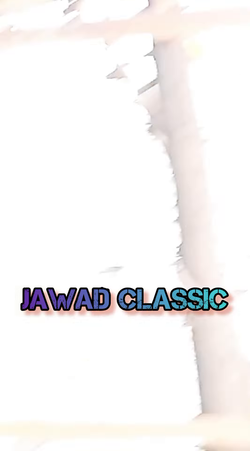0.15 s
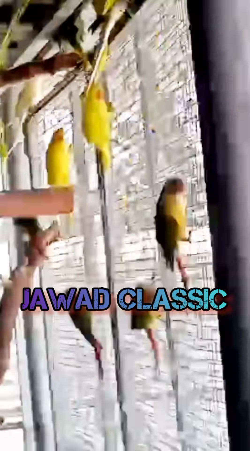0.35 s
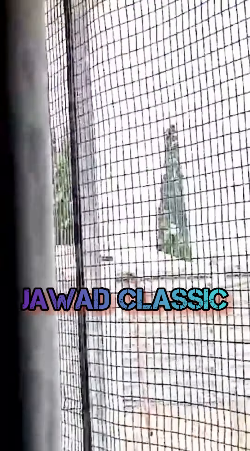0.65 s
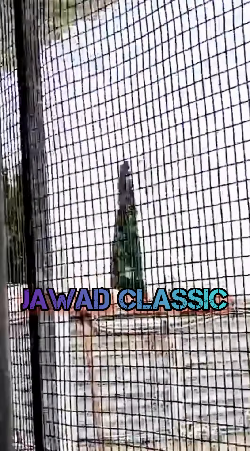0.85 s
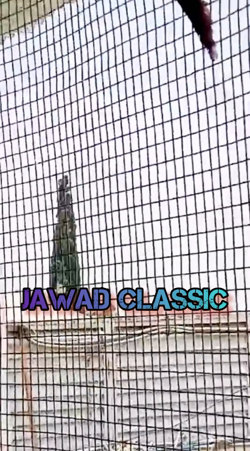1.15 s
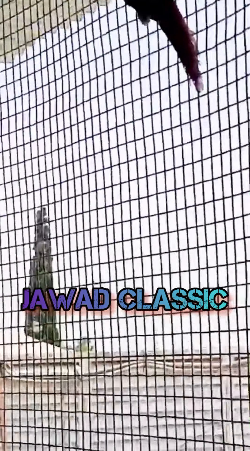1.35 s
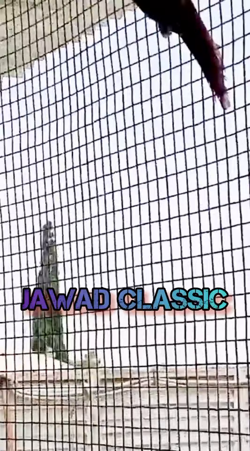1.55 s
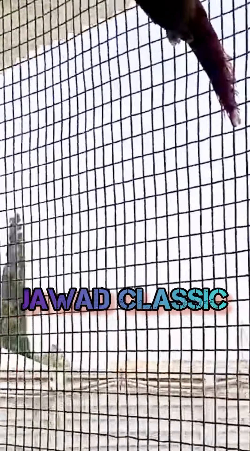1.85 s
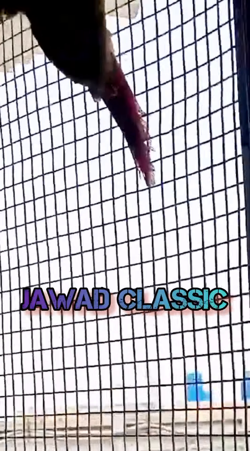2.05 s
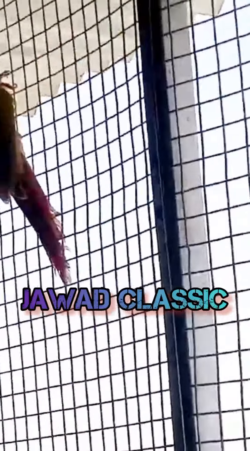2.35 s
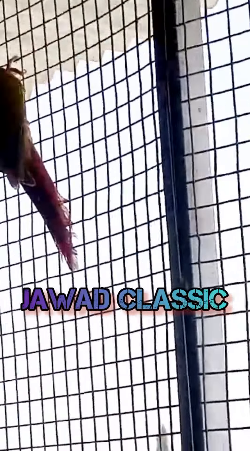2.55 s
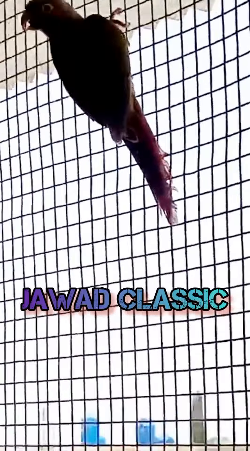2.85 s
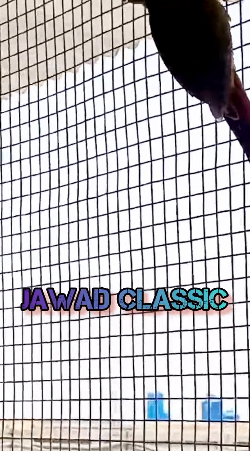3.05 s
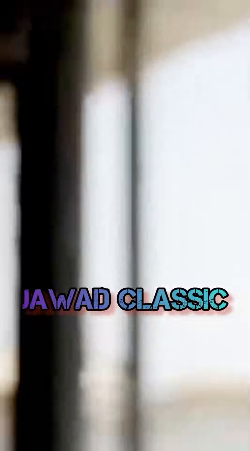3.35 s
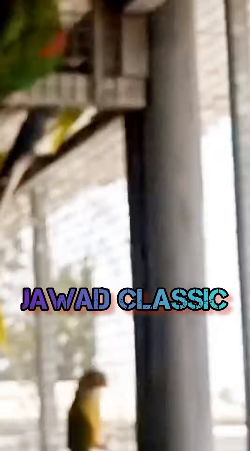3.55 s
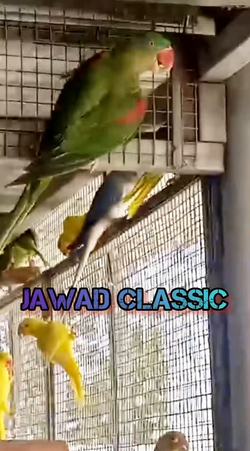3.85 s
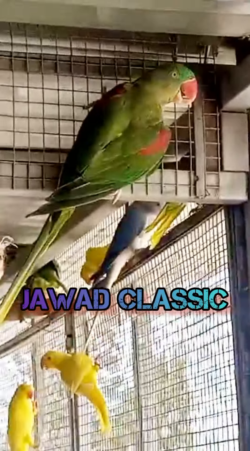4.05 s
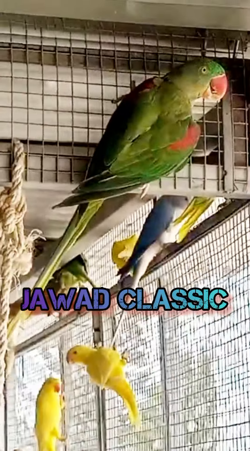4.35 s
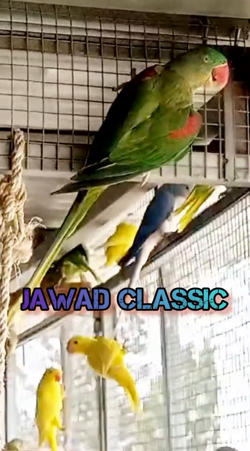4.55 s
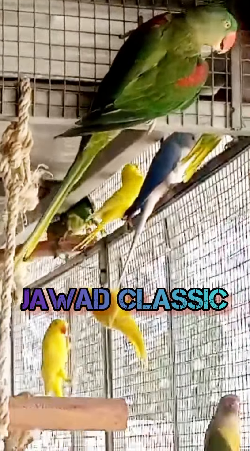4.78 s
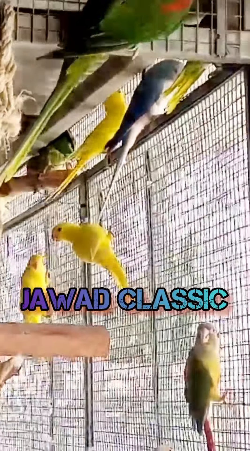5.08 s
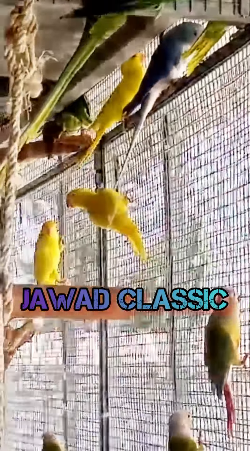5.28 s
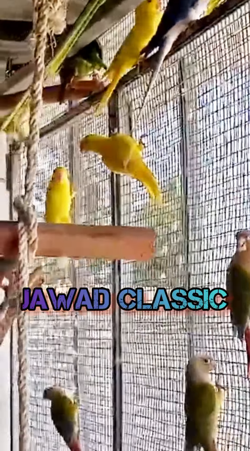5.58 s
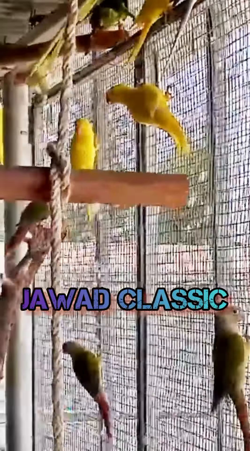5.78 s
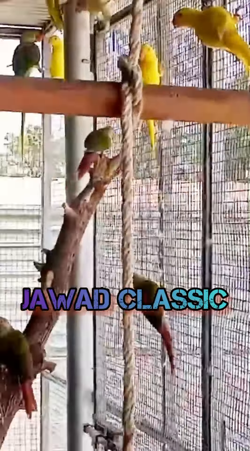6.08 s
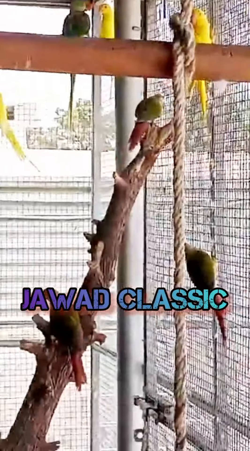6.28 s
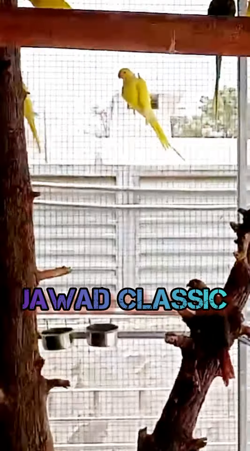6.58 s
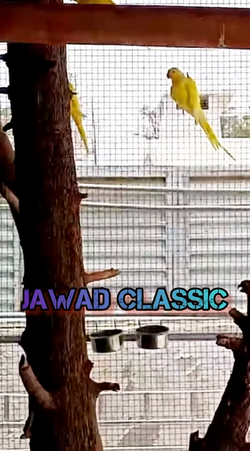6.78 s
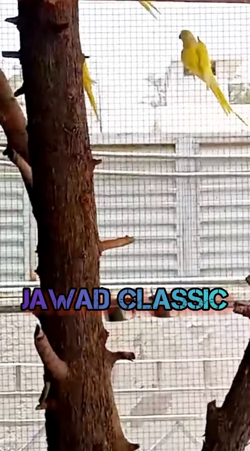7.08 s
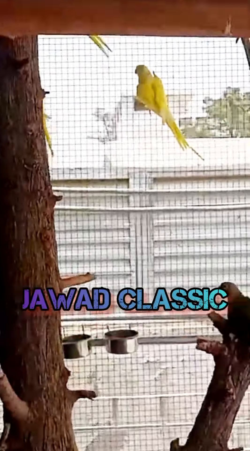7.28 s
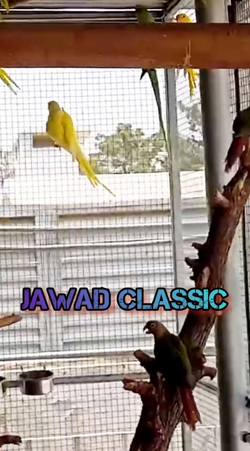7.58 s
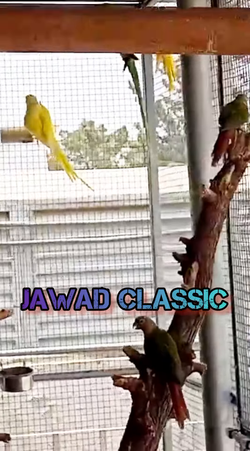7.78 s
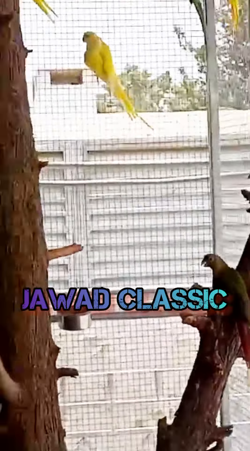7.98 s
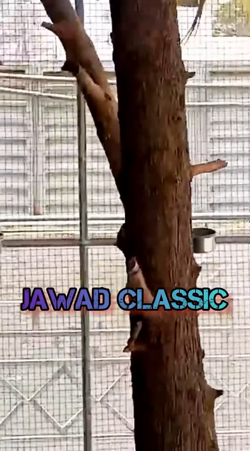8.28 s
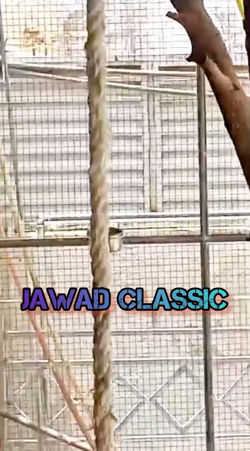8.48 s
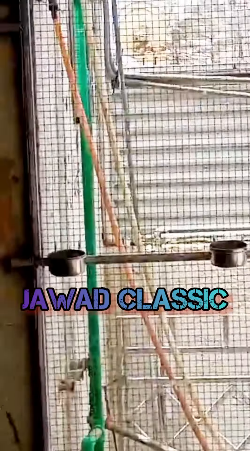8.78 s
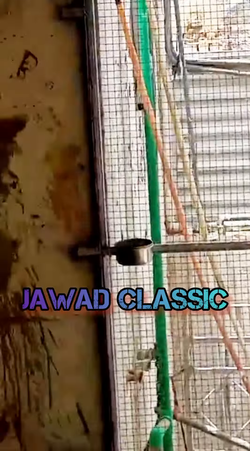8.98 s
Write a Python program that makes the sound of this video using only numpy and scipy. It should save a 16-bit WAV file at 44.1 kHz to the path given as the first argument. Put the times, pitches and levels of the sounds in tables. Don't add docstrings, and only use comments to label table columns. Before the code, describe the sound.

Inside a walled aviary, low outdoor rumble, wind puffs, feather rustle and claws ticking on wire come first. A larger parrot gives one rough high shriek; smaller birds then whistle and drop into nasal falling squawks, with gaps between. Later a thin neighbouring cry joins, and loud shrieks breaking into squeals crowd the end. A handheld phone a few metres away catches smeared reflections off hard walls.

```python
import sys
import numpy as np
from scipy import signal
from scipy.fft import rfft, irfft, next_fast_len
from scipy.io import wavfile
from scipy.ndimage import uniform_filter1d

SR = 44100
rng = np.random.default_rng(int(sys.argv[2]) if len(sys.argv) > 2 else 0)


def gain_from_db(level_db):
    decades = np.asarray(level_db, float) / 20
    return 10 ** decades


def to_wav(sig):
    pcm = np.clip(np.atleast_2d(sig), -1, 1) * 32767
    pcm = np.round(pcm).astype(np.int16)
    wavfile.write(sys.argv[1], SR, pcm.T)


N = 402633


def unit(x):
    return x / np.sqrt(np.mean(x ** 2))


def colour(points, hz):
    point_hz, db = np.transpose(points)
    return np.interp(np.log(np.maximum(hz, 1)), np.log(point_hz), db)


def shaped(x, gain):
    size = next_fast_len(len(x))
    hz = np.arange(size // 2 + 1) * SR / size
    return irfft(rfft(x, size) * gain(hz), size)[:len(x)]


def walk(rate, size):
    k = max(int(SR / rate), 1)
    noise = rng.standard_normal(size + 2 * k)
    smooth = uniform_filter1d(uniform_filter1d(noise, k), k)
    return unit(smooth[k:k + size])


def swells(rows, onset=1):
    t = np.arange(0, N, 64) / SR
    power = 0
    for s, half_s, db in rows:
        span_s = half_s * np.where(t < s, onset, 1)
        power = power + gain_from_db(2 * db) * np.exp(-2 * ((t - s) / span_s) ** 2)
    return np.interp(np.arange(N) / SR, t, power)


# frequency in Hz, density in dB per Hz.
RUMBLE_SPECTRUM = [(15, -61), (25, -28.5), (102, 6), (220, -0.5), (290, -38.5), (480, -120)]
GUST_SPECTRUM = [(88, -27), (150, -1), (232, -0.5), (355, -4), (404, -8.5), (605, -8), (900, -10.5),
                 (1170, -12.5), (1980, -120)]
RUSTLE_SPECTRUM = [(290, -6.5), (500, -12.5), (600, -16), (712, -14.5), (1180, 4.5), (1480, 8), (2020, 4.5),
                   (3200, 2.5), (6500, -26), (8450, -44.5), (14300, -120)]
HISS_SPECTRUM = [(2940, -10.5), (5000, -5), (5570, -11.5), (6570, -14), (7790, -12), (8970, -1.5),
                 (10900, -17.5), (12600, -16.5), (14900, -15.5), (16000, -8.5)]
REST_DB = [-46.5, -46, -52, -65.5]
DUCK_DB = [1.5, 4.2, 3.8, 11]
# time in seconds, half length in seconds, level in dB.
PUFFS = [(0, 0.31, -43), (.64, 0.11, -47), (2.58, 0.056, -42.5), (3.23, 0.19, -47), (3.68, 0.19, -46.5),
         (4.1, 0.18, -46), (4.68, 0.31, -39), (4.91, 0.13, -39.5), (5.35, 0.16, -46), (6.78, 0.11, -36.5),
         (7.0, 0.51, -48), (7.5, 0.6, -52.5), (7.96, 0.45, -44), (8.35, 0.22, -46), (8.96, 0.14, -36.5),
         (9.13, 0.066, -42)]
# time in seconds, half length in seconds, rustle in dB, extra hiss in dB.
FLUTTERS = [(0, 0.095, -47, 8), (0.338, 0.18, -49.5, 7), (0.544, 0.094, -51, 7), (0.805, 0.063, -52, 7),
            (1.076, 0.12, -48.5, 5), (1.342, 0.075, -44, 5.5), (1.728, 0.039, -48, -20),
            (2.163, 0.12, -37, 4.5), (2.532, 0.21, -50, 9.5), (2.763, 0.16, -37.5, -4),
            (3.168, 0.16, -54.5, 8.5), (3.382, 0.13, -57, 15), (3.852, 0.022, -49, 12),
            (4.43, 0.24, -48, 5.5), (4.825, 0.17, -38.5, -6.5), (5.203, 0.29, -51.5, 5),
            (5.534, .06, -59, 9), (5.937, 0.078, -47.5, 6), (6.305, 0.093, -42, 10),
            (6.736, 0.051, -40.5, -7), (6.879, 0.081, -28.5, -12), (7.085, 0.074, -47, 6),
            (7.49, 0.45, -38.5, -3), (7.88, 0.43, -44.5, -19), (8.366, 0.15, -34.5, -3.5),
            (8.56, 0.082, -38, 9.5), (8.654, 0.13, -37.5, -5), (8.884, 0.081, -35, 0),
            (9.001, 0.033, -34.5, 7.5), (9.116, 0.078, -31, 6)]


def air(birds):
    traffic = swells([(5.4, 1.65, -41.5)])
    wind = swells(PUFFS)
    feathers = swells([row[:3] for row in FLUTTERS], 0.83)
    feather_db = -14
    feather_hiss = swells([(s - .03, half_s, db + hiss_db + feather_db)
                           for s, half_s, db, hiss_db in FLUTTERS], 0.38)
    swelling = [traffic + gain_from_db(2 * -18) * wind, wind, feathers, feather_hiss]

    duck_from_db, hold_s = -29, 0.22
    pull = 1 / (hold_s * SR)
    late_power = signal.lfilter([pull], [1, pull - 1], birds ** 2)
    duck = np.clip((10 * np.log10(late_power + 1e-12) - duck_from_db) / 20, 0, 1)

    spectra = (RUMBLE_SPECTRUM, GUST_SPECTRUM, RUSTLE_SPECTRUM, HISS_SPECTRUM)
    flickers_db, trims_db = (1.4, 0.23, 3.3, 1.05), (0.085, 0.051, 0.47, 5.9)
    layers = zip(spectra, REST_DB, swelling, DUCK_DB, flickers_db, trims_db)
    out = 0
    for spectrum, rest_db, swell, duck_db, flicker_db, trim_db in layers:
        noise = shaped(rng.standard_normal(N), lambda f: gain_from_db(colour(spectrum, f)))
        level = np.sqrt(gain_from_db(2 * (rest_db - duck_db * duck)) + swell)
        out = out + unit(noise) * level * gain_from_db(trim_db + flicker_db * walk(31.0, N))
    return out


def walls(x):
    low_t60_s, treble_t60_s, near_t60_s = 0.44, 0.2, 0.086
    near_db, direct_db, split_hz = 6.5, -8, 4500
    t = np.arange(SR) / SR
    low = shaped(rng.standard_normal(SR), lambda f: 1 / np.sqrt(1 + (f / split_hz) ** 4))
    high = shaped(rng.standard_normal(SR), lambda f: 1 / np.sqrt(1 + (split_hz / (f + 1)) ** 4))
    tail = low * gain_from_db(-60 * t / low_t60_s) + high * gain_from_db(-60 * t / treble_t60_s)
    tail = tail + gain_from_db(near_db) * rng.standard_normal(SR) * gain_from_db(-60 * t / near_t60_s)
    tail = tail * np.minimum(t / 0.0045, 1)
    echoes = signal.fftconvolve(x, tail / np.sqrt(np.sum(tail ** 2)))[:N]
    return gain_from_db(direct_db) * x + echoes


def scuff(s, db, hz, width_hz, decay_s):
    t = np.arange(SR // 2) / SR
    scrape = shaped(rng.standard_normal(len(t)), lambda f: 1 / (1 + ((f - hz) / width_hz) ** 2))
    return int(s * SR), gain_from_db(db - 2.0) * unit(scrape) * np.exp(-t / decay_s) * np.minimum(t / 0.01, 1)


# time in seconds,
# peak in dB, centre in Hz.
SCUFFS = [(1.0717, -23, 1760), (1.296, -22, 1390), (2.1051, -24.5, 1370), (2.177, -23, 1500),
          (3.822, -13, 2960), (4.32, -36, 3180)]
# time in seconds, peak in dB, centre in Hz.
WING_BEATS = [(4.482, -27, 218)]


def wings_and_feet():
    ticks = [scuff(*row, width_hz=870, decay_s=0.011) for row in SCUFFS]
    return ticks + [scuff(*row, width_hz=180, decay_s=0.071) for row in WING_BEATS]


def effort(t, swell_s, fade_s, swell_db, fade_db):
    swell = swell_db * np.clip(1 - t / swell_s, 0, 1)
    return swell + fade_db * np.clip(1 - (t[-1] - t) / fade_s, 0, 1)


def glide(s, length_s, first_hz, last_hz, db, fall_s, bend, swell_s, fade_s, bright_db):
    t = np.linspace(0, length_s, num=40)
    hz = last_hz + (first_hz - last_hz) * np.clip(1 - t / fall_s, 0, 1) ** bend
    level_db = db + effort(t, swell_s, fade_s, swell_db=-18, fade_db=-23.5)
    dulling_db = -6 * (t / length_s - .5)
    return np.transpose([s + t, hz, level_db, bright_db + dulling_db])


def read(table, fade_s):
    s, *columns = np.transpose(table)
    start = int(s[0] * SR)
    t = np.arange(start, min(int(s[-1] * SR), N)) / SR
    gate = np.clip(np.minimum(t - t[0], t[-1] - t) / fade_s, 0, 1)
    return start, [np.interp(t, s, c) for c in columns], gate


# frequency in Hz, gain in dB.
THROAT = [(700, -10), (1000, -9.5), (2000, 6.5), (2700, 6), (3500, -6), (5000, -13), (6500, -28.5),
          (8800, -33.5), (11000, -57), (14000, -83)]


def syrinx(table, count, lead, hoarse, gape=1, third_db=0):
    start, (hz, db, bright_db), gate = read(table, 0.0015)
    size = len(hz)
    hoarse = hoarse * np.linspace(1.2, .7, size)
    hz = hz * (1 + .06 * hoarse * walk(300, size))
    phase = 2 * np.pi * np.cumsum(hz) / SR
    stack = 0
    for k in range(1, count + 1):
        tone_db = colour(THROAT, k * hz / gape) - colour(THROAT, lead * hz / gape)
        tone_db = tone_db + bright_db * np.log2(k / lead) + third_db * (k == 3)
        stack = stack + (k * hz < .4 * SR) * gain_from_db(tone_db) * np.sin(k * phase)
    return start, np.sqrt(2) * gate * gain_from_db(db) * (1 + hoarse * walk(412, size)) * stack


# start in seconds, length in seconds, first pitch in Hz, last pitch in Hz, level in dB.
JOINERS = [
    (7.163, 0.17, 1793, 1326, -29.5),
    (8.148, .13, 1850, 1363, -27),
]


def joiners():
    calls = [glide(*row, row[1], 1.2, 0.0094, 0.098, -0.5) for row in JOINERS]
    return [syrinx(call, count=4, lead=1, hoarse=.45) for call in calls]


# start in seconds, length in seconds, first pitch in Hz, last pitch in Hz, level in dB.
WHISTLES = [(2.595, 0.077, 2284, 2070, -12.5), (4.727, 0.041, 2360, 2040, -38),
            (5.68, 0.046, 2370, 2142, -20), (6.786, 0.021, 2520, 2280, -21),
            (7.134, 0.048, 2223, 2404, -19), (8.095, .05, 2382, 2318, -11.5),
            (8.636, 0.037, 2400, 2360, -16), (8.773, 0.064, 2330, 2270, -21)]
# start in seconds, length in seconds, first pitch in Hz, last pitch in Hz, level in dB.
CHIRP = (3.843, .032, 4020, 3230, -16)
# start in seconds, length in seconds, first pitch in Hz, last pitch in Hz, level in dB.
SQUEALS = [(1.818, 0.036, 4250, 3360, -24), (5.588, .05, 4440, 3380, -25),
           (8.532, 0.044, 4510, 3020, -18.5), (8.795, 0.057, 4760, 3180, -23),
           (9.045, .06, 4740, 3300, -20.5)]


def whistles():
    # pitch fall s, bend, swell s, fade s, brightness dB per octave
    calls = [glide(*row, row[1], 1.245, 0.015, 0.0046, -2.5) for row in WHISTLES]
    calls += [glide(*CHIRP, .032, 1.2, .006, .003, 8)]
    calls += [glide(*row, row[1], 0.86, 0.007, 0.022, -8) for row in SQUEALS]
    return [syrinx(call, count=4, lead=1, hoarse=.18) for call in calls]


def held(s, length_s, note_hz, second_hz, db, swell_s, fade_s, rasp, second_db):
    t = np.linspace(0, length_s, num=40)
    level_db = db + effort(t, swell_s, fade_s, swell_db=-9.5, fade_db=-14)
    second_level_db = second_db + 9 * np.exp(-t / 0.016)
    rasp_share = rasp * (0.15 + 0.42 * t / length_s)
    return np.transpose([s + t, note_hz + 0 * t, level_db, rasp_share, second_hz + 0 * t, second_level_db])


NOTE_OVERTONES_DB = [0.5, -23, -32, -62]
# centre in Hz, width in Hz, level in dB.
RASP = [(1500, 160, -26.5), (2370, 620, 5.5), (3400, 530, 13), (4550, 870, -4), (6980, 1000, -57),
        (8420, 560, -9)]


def shriek(table):
    start, (hz, db, rasp, second_hz, second_db), gate = read(table, 0.0065)
    size = len(hz)
    t = np.arange(size) / SR
    flutter_hz = 12 * (1 + .15 * walk(30, size))
    flutter = .5 + .5 * np.cos(2 * np.pi * np.cumsum(flutter_hz) / SR)
    rise, fall = np.exp(-t / .015), np.exp((t - t[-1]) / .04)
    sag = .2 * rise ** 2 + .12 * fall ** 2 + .1 * flutter ** 5 + .01 * walk(200, size) - .012
    rasp = np.maximum(np.clip(rasp, 0, 1), np.exp(-(t / .043) ** 6))

    phase = 2 * np.pi * np.cumsum(hz * (1 - sag)) / SR
    note = sum(gain_from_db(d) * np.sin((k + 1) * phase) for k, d in enumerate(NOTE_OVERTONES_DB))
    note = unit(note * gain_from_db(3.5 * walk(150, size)))

    second_bend = 1 - 0.34 * rise - .28 * fall + 0.0263 * walk(236, size)
    second_phase = 2 * np.pi * np.cumsum(second_hz * second_bend) / SR
    second = np.sin(second_phase) + gain_from_db(-8.5 + 8.9 * fall) * np.sin(2 * second_phase)
    second = second * gain_from_db(second_db + 3 * walk(150, size))

    def resonances(f):
        return sum(gain_from_db(d) / (1 + (2 * (f - centre) / width) ** 2) for centre, width, d in RASP)

    breath = shaped(rng.standard_normal(size), resonances)
    breath = unit(breath * gain_from_db(3 * walk(100, size)))
    return start, gate * gain_from_db(db) * (np.sqrt(1 - rasp) * (note + second) + np.sqrt(rasp) * breath)


# start in seconds, length in seconds, held note in Hz, second voice in Hz, level in dB.
SHRIEKS = [
    (1.671, 0.18, 3232, 2190, -14.5),
    (5.434, 0.2, 3385, 2327, -12.5),
    (7.327, .165, 3378, 2320, -11.5),
    (7.502, 0.32, 3290, 2360, -21.5),
    (8.439, 0.15, 3391, 2220, -9.5),
    (8.698, 0.14, 3350, 2410, -12.5),
    (8.951, .16, 3336, 2314, -12),
]
# swell in seconds, fade in seconds, rasp amount (times 0.57 = share at the
# end), second voice in dB against the note.
SHRIEK_DELIVERY = [(.06, .03, .35, -15), (.012, .05, .25, -11), (.06, .02, .4, -17), (.02, .15, 1.7, -16),
                   (.03, .075, .15, -13), (.05, .06, .15, -12), (.045, .04, .2, -12)]


def shrieks():
    return [shriek(held(*call, *how)) for call, how in zip(SHRIEKS, SHRIEK_DELIVERY)]


# start in seconds, length in seconds, first pitch in Hz, last pitch in Hz, level in dB.
SQUAWKS = [(2.64, 0.13, 1838, 785.6, -17), (3.621, 0.18, 1329, 874, -20), (3.87, 0.17, 2376, 1606, -23.5),
           (4.783, 0.17, 1383, 836, -15.5), (5.721, 0.25, 1497, 1246, -30), (6.231, .24, 1612, 814, -17.5),
           (6.803, 0.24, 1108, 743, -22.5), (7.185, 0.15, 1425, 1288, -26), (7.887, 0.15, 1142, 751, -25.5),
           (8.152, 0.19, 1399, 1200, -26), (8.538, 0.17, 1138, 777.3, -25)]
# pitch fall in seconds, bend (1 = even fall), swell in seconds,
# fade in seconds, brightness in dB per octave.
SQUAWK_DELIVERY = [(.095, 0.94, 0.017, 0.034, 0), (.12, 1.7, 0.055, 0.053, -7.5),
                   (.11, 1.05, .006, 0.06, 7), (.14, 1.7, 0.035, 0.029, 0), (.15, 0.26, 0.045, 0.11, -8),
                   (.17, 2.2, 0.05, 0.09, 1), (.16, .7, 0.015, 0.091, -4.5), (.14, 1.5, 0.014, .04, -4),
                   (.115, 1.05, 0.03, 0.041, -6), (.17, 0.71, 0.0037, 0.048, -4.5),
                   (.09, 1.2, 0.0049, 0.054, -3.5)]
# roughness (0-1), beak opening that shifts the throat colour (ratio), third partial in dB.
HOARSENESS = [.52, .14, .2, .22, .4, .22, .34, .5, .24, .6, .26]
BEAK_GAPE = [1.157, 1.03, 1.18, 0.94, 1.203, 0.94, 0.88, 1.29, 0.87, 1.154, 1.1]
THIRD_PARTIAL_DB = [2.5, 0.5, -7.5, -9.5, -3, -2, 2.5, -4, -7, 1, -3]


def squawks():
    voices = zip(SQUAWKS, SQUAWK_DELIVERY, HOARSENESS, BEAK_GAPE, THIRD_PARTIAL_DB)
    return [syrinx(glide(*call, *how), count=11, lead=2.28, hoarse=hoarse, gape=gape, third_db=third_db)
            for call, how, hoarse, gape, third_db in voices]


def scene():
    birds = np.zeros(N)
    for start, sound in wings_and_feet() + joiners() + whistles() + shrieks() + squawks():
        birds[start:start + len(sound)] += sound
    birds = walls(birds)
    return (birds + air(birds))[None]


def band_limit(x):
    return signal.sosfilt(signal.butter(12, 16910, fs=SR, output="sos"), x)


def record(dry):
    top_cut = signal.ellip(10, .2, 70, 15800, fs=SR, output="sos")
    low_cut = signal.butter(2, 48, "high", fs=SR, output="sos")
    mix = signal.sosfilt(np.vstack([top_cut, low_cut]), np.tanh(dry))
    return band_limit(mix)


dry = scene()
out = record(dry)
to_wav(out)
```